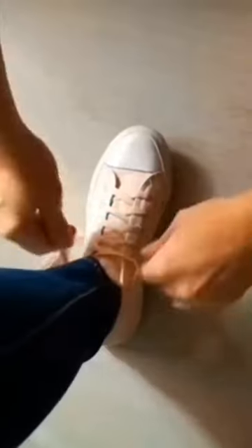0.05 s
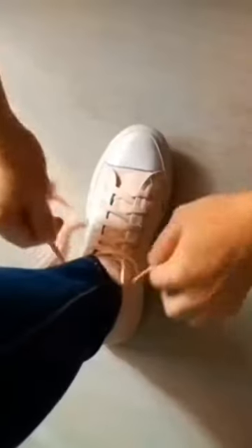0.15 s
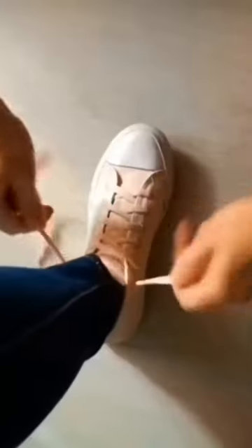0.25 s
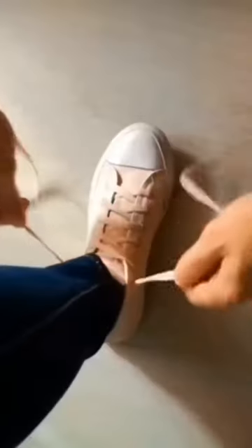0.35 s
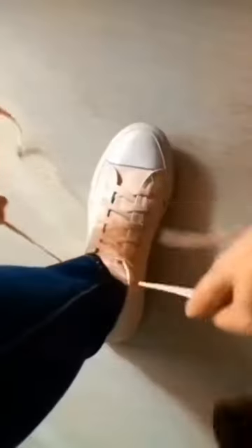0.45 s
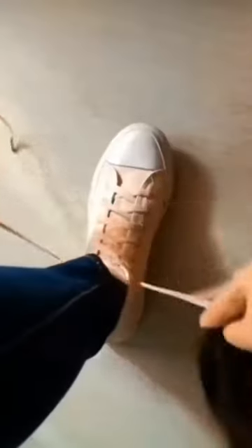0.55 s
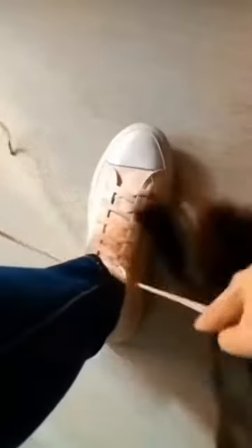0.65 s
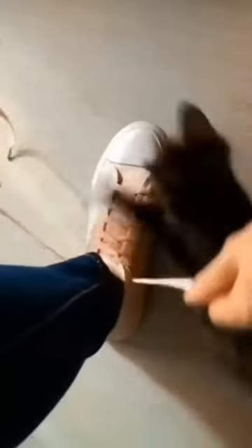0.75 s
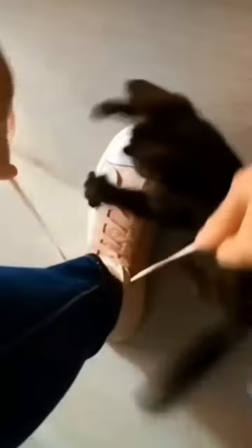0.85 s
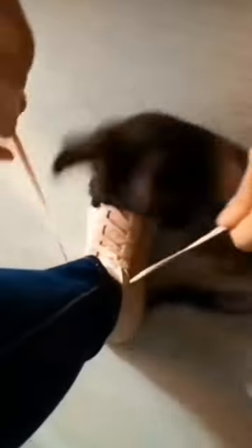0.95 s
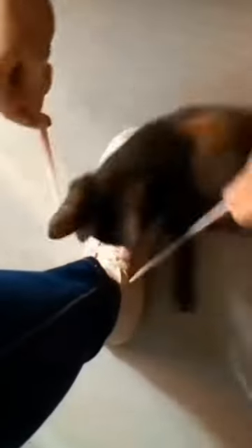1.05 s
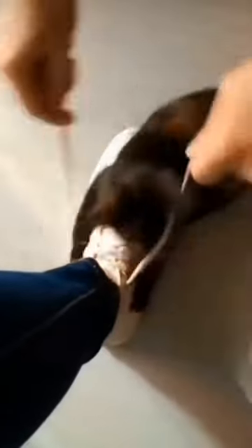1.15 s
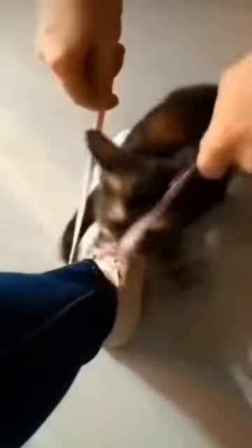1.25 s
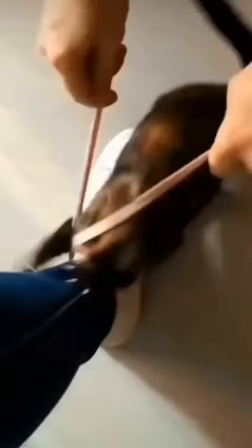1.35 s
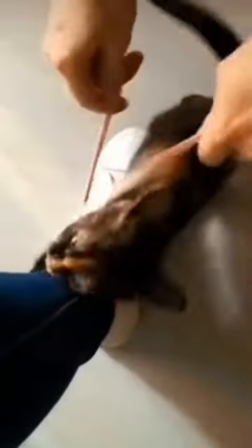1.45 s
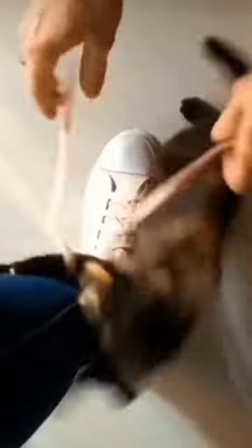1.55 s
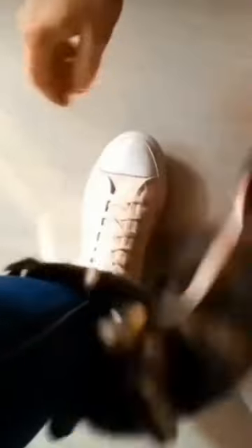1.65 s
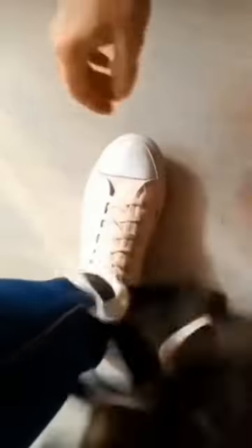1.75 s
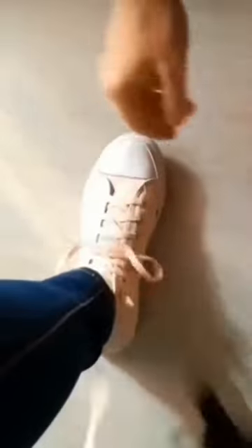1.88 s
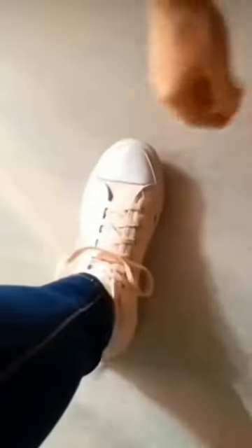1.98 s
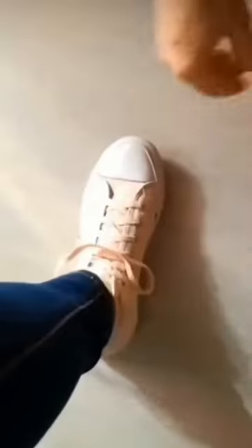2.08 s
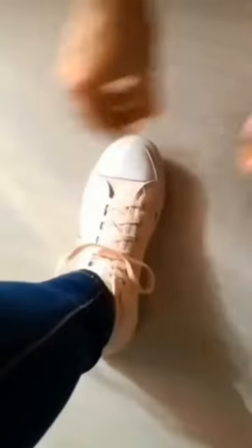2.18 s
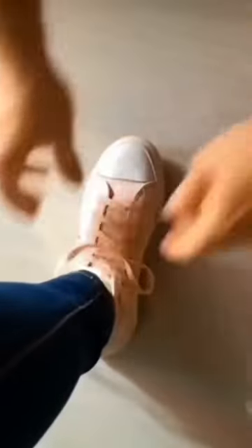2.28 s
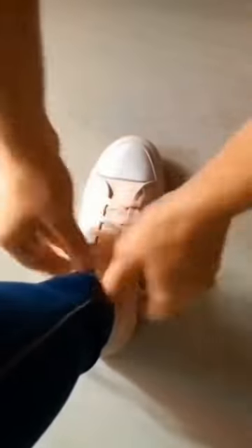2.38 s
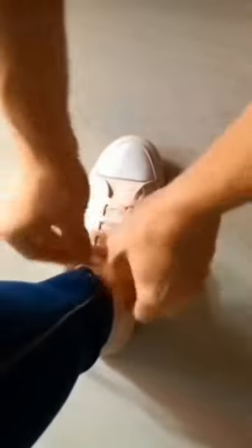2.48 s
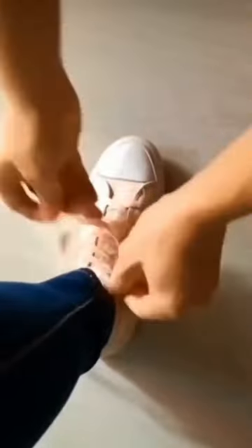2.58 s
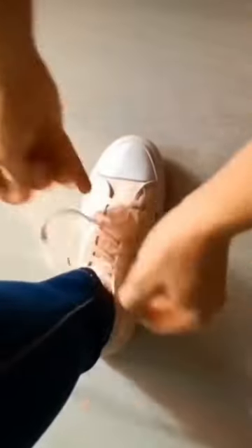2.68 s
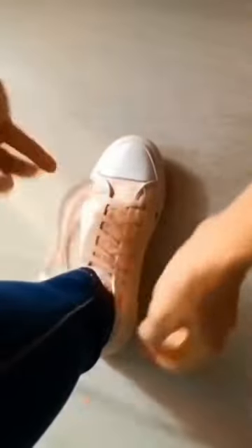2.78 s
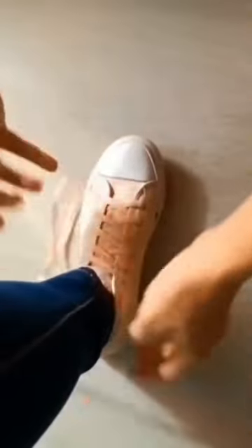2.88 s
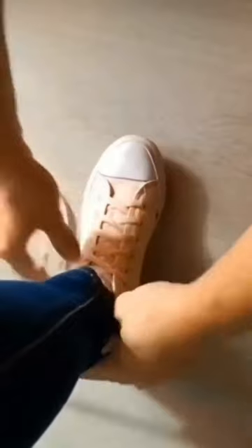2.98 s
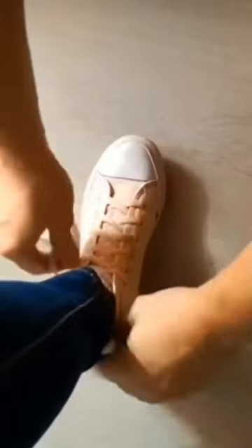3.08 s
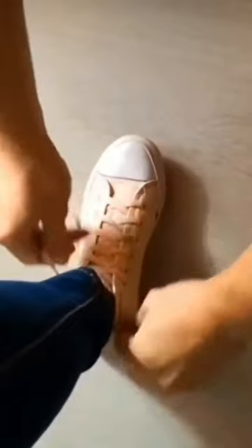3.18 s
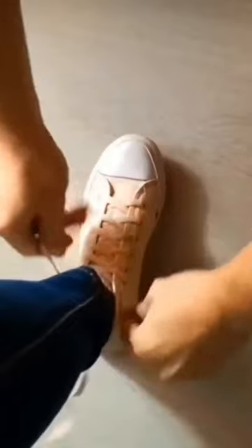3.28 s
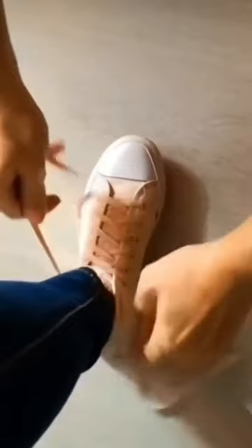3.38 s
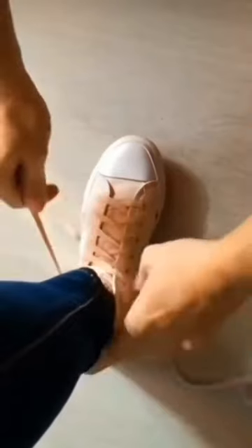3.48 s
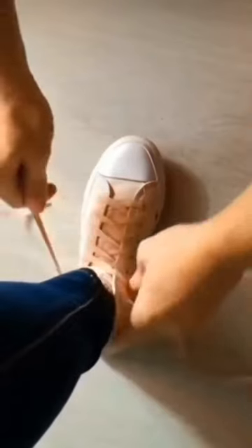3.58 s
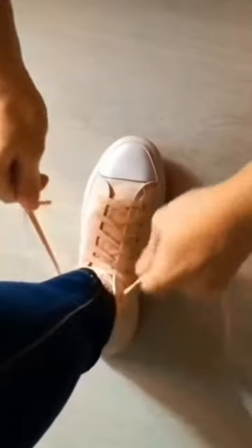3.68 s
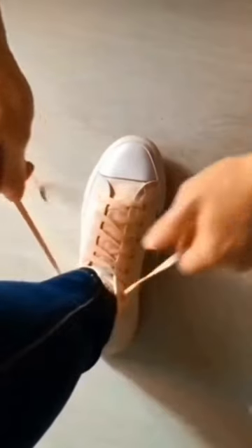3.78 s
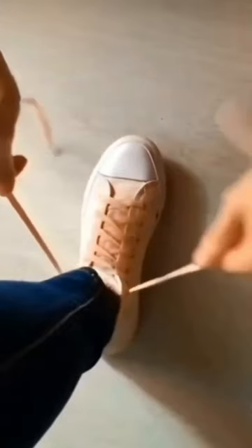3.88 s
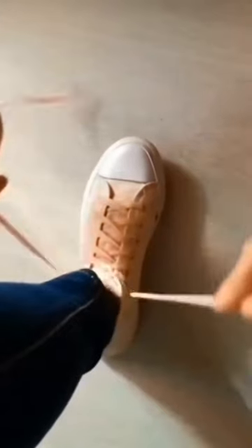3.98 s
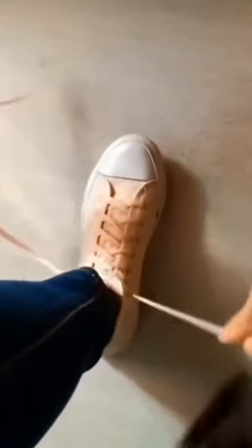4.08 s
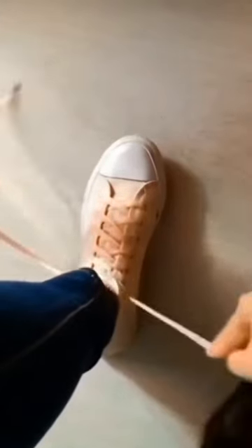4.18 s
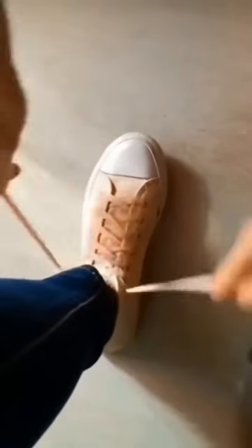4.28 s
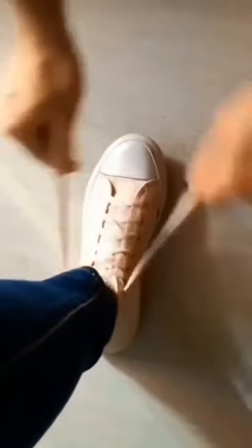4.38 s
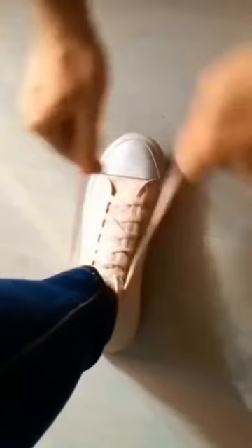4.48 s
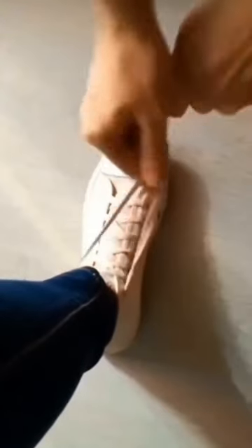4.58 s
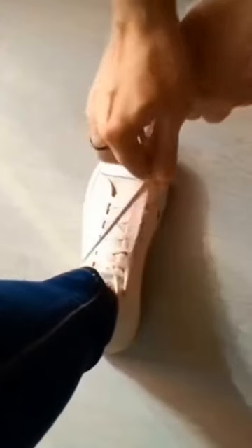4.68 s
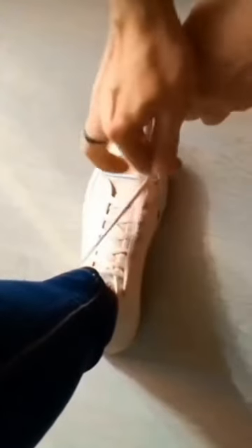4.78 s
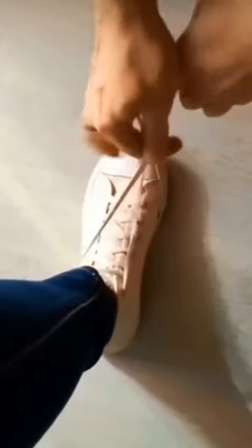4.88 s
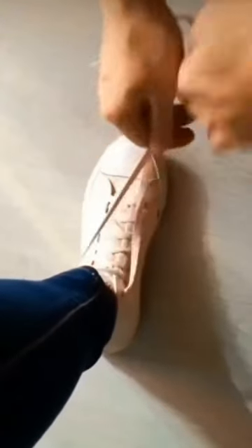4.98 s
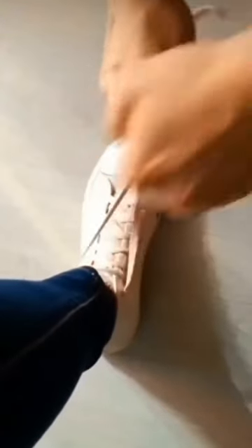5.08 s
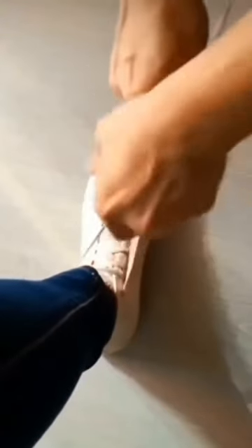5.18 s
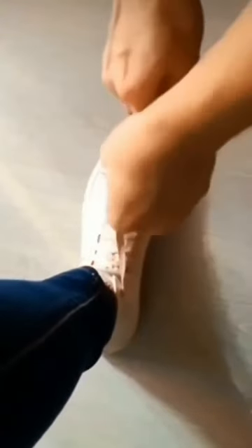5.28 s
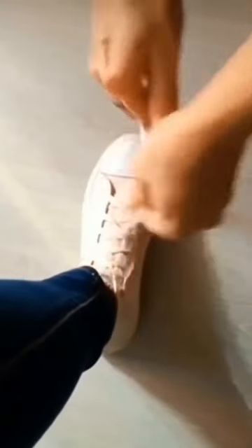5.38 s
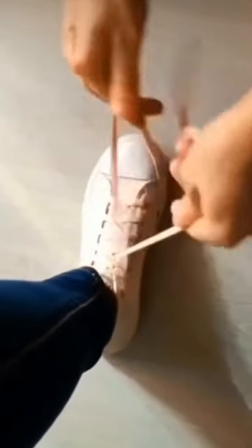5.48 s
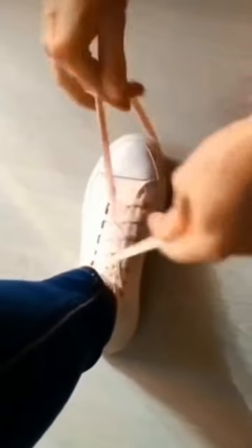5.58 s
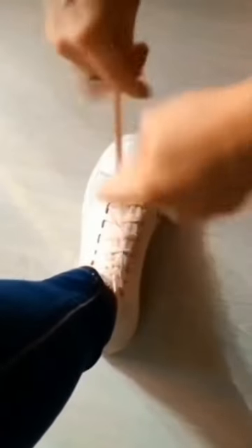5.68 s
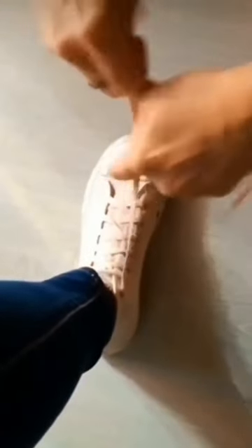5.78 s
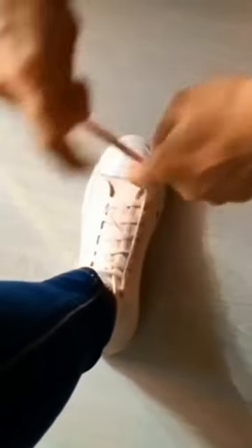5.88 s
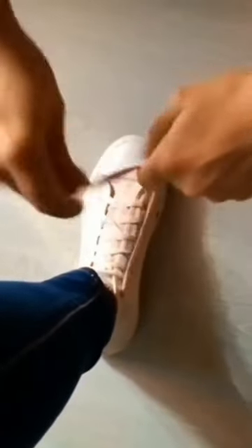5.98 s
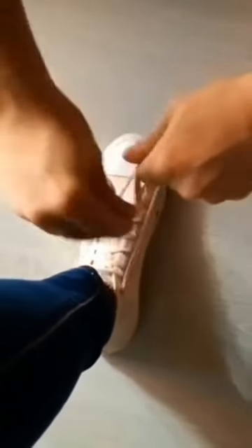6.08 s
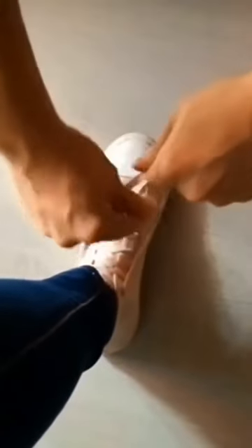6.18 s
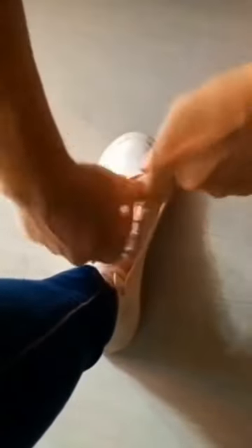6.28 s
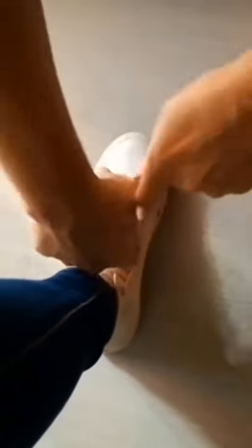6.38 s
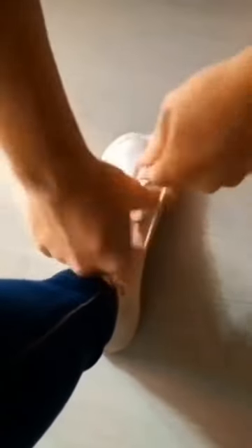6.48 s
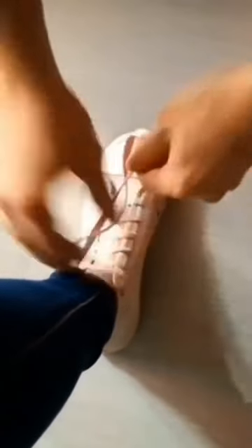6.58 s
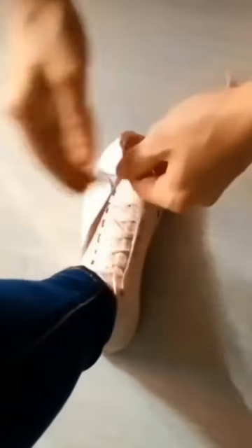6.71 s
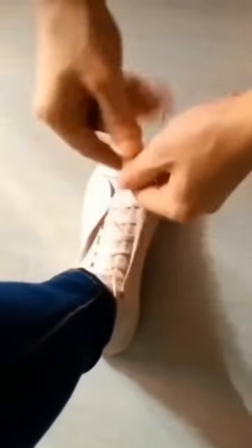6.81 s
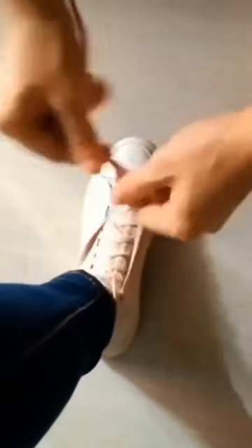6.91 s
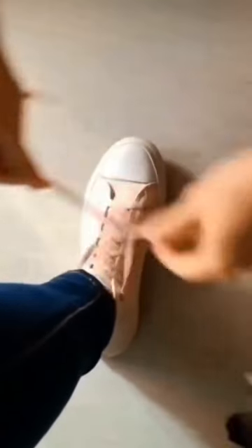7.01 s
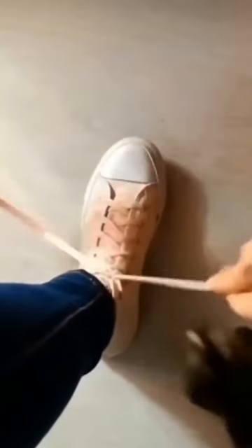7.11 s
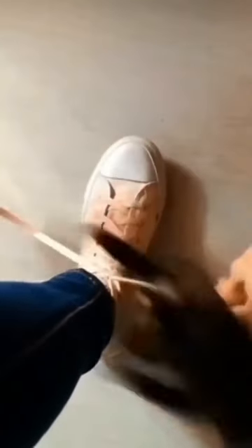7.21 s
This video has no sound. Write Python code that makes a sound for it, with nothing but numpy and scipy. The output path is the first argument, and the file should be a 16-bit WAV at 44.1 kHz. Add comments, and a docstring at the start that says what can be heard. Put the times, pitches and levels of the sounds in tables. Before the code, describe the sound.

Laces rub through a canvas shoe in uneven strokes, mixed with sharp clicks, hollow knocks and paw thuds over a low room rumble.

```python
"""On a hard floor indoors, hands pull and tie the flat laces of a canvas shoe as a kitten pounces on them.
Lace, skin and fur rub in countless tiny slips. The hollow shoe booms near 900 Hz when knocked,
paws and sole thud on the floor, and lace tips and claws snap on rubber and floor.
Two close microphones hear it all over a low room rumble, and overload on the loudest peaks."""
import sys
import numpy as np
from scipy import signal
from scipy.io import wavfile
from scipy.ndimage import uniform_filter1d

SR = 44100
rng = np.random.default_rng(int(sys.argv[2]) if len(sys.argv) > 2 else 0)


def to_wav(sig):
    """Store sig (one row per channel, or 1-D mono) as 16-bit WAV at the path in sys.argv[1].

    Samples outside -1..1 are clipped; the rate is SR.
    """
    pcm = np.clip(np.atleast_2d(sig), -1, 1) * 32767
    pcm = np.round(pcm).astype(np.int16)
    wavfile.write(sys.argv[1], SR, pcm.T)  # frames by channels


N = 319711


def from_db(db):
    """Turn decibels into a number to multiply by."""
    return 10 ** (np.asarray(db) / 20)


def rms_one(x):
    """Scale a sound so that its average strength (rms) is 1."""
    return x / np.sqrt(np.mean(x ** 2) + 1e-20)


def in_time(rows):
    """Join rows that start with a time by straight lines: one curve for each later column."""
    times, *columns = np.transpose(rows)
    return [np.interp(np.arange(N) / SR, times, column) for column in columns]


def at_hz(rows, hz):
    """Look up a value between rows of pitch and value, with octaves evenly spaced."""
    pitches, values = np.transpose(rows)
    return np.interp(np.log(hz), np.log(pitches), values)


def panned(db):
    """Left and right gains for a pan: how many dB louder the left side is than the right."""
    return from_db(np.multiply.outer([.5, -.5], db))


def resonance(x, hz, width_hz):
    """Let a sound ring around one pitch; a narrower width rings longer."""
    r = np.exp(-np.pi * width_hz / SR)
    feedback = [1, -2 * r * np.cos(2 * np.pi * hz / SR), r * r]
    return signal.lfilter([(1 - r * r) / 2, 0, (r * r - 1) / 2], feedback, x)


def drift_gain(rate_hz, spread_db):
    """A volume that wanders by chance, typically by spread_db."""
    step = 40   # samples between points
    r = np.exp(-2 * np.pi * rate_hz * step / SR)
    slow = signal.lfilter([1], [1, -2 * r, r * r], rng.standard_normal(N // step + 2002))[2000:]
    return np.interp(np.arange(N) / step, np.arange(len(slow)), from_db(spread_db * rms_one(slow)))


def swells(*columns):
    """Each event's power at every 32nd sample: it rises 20 dB per rise_s, holds, falls 20 per fade_s."""
    start, db, rise_s, hold_s, fade_s = (np.reshape(column, (-1, 1)) for column in columns)
    t = np.arange(N // 32 + 2) * 32 / SR
    away = np.maximum((start - t) / rise_s, (t - start - hold_s) / fade_s)
    return from_db(db - 20 * np.clip(away, 0, 10)) ** 2


def level(*powers):
    """Add up swells and give their level in dB at every sample."""
    total = np.vstack(powers).sum(axis=0)
    return np.interp(np.arange(N) / 32, np.arange(len(total)), 10 * np.log10(total))


# How alike the two microphones sound. Each row: pitch in Hz, likeness from 0 (unrelated) to 1 (same).
MIC_LIKENESS = [(40, 1), (125, 0.86), (250, 0.92), (500, 0.14), (1500, 0.55), (4000, 0.27), (10000, 0.88)]


def stereo(mid, side, hz):
    """Mix two unrelated sounds into left and right: mid is shared, side makes them differ."""
    alike = at_hz(MIC_LIKENESS, hz)
    return np.sqrt(1 + alike) * mid + np.sqrt(1 - alike) * side * np.array([[1], [-1]])


def grains(per_s, spread_db):
    """Fibres slip at random moments, making clicks of uneven size: two pairs of click streams."""
    chance = rng.random((2, 2, N)) * SR / per_s
    slips = chance < 1
    size_db = spread_db * np.minimum(-np.log(chance[slips] + 1e-9), 5)
    out = np.full(chance.shape, 1e-18)
    out[slips] = from_db(size_db) * rng.choice([-1, 1], slips.sum())
    return rms_one(out)


def rubbed_body(tones, level_db, per_s, lumpy_db):
    """Slips come in lumps and make an object ring at a few broad tones of its own."""
    mid, side = grains(per_s, spread_db=1)[0] * drift_gain(32, lumpy_db)
    ringing = np.zeros((2, N))
    for k, (hz, width, db) in enumerate(tones):
        tone = stereo(resonance(mid, hz, width), resonance(side, hz, width), hz)
        ringing += (-1) ** k * from_db(db) * tone
    return from_db(level_db) * rms_one(ringing)


# The tone of the room's rumble. Each row: pitch in Hz, relative level in dB.
RUMBLE_TONE = [(12, -32), (20, 5), (60, 0.5), (87, 5.5), (119, -5.5), (160, -6), (300, -20), (340, -19.5),
               (400, -7), (520, -37), (880, -120)]
# The rumble swells and sinks. Each row: time in seconds, hum near 90 Hz in dB, throb near 40 Hz in dB.
RUMBLE_SWELLS = [(0.09, -38.5, -48), (0.29, -31.5, -39), (1.54, -31, -35), (1.98, -25, -34),
                 (2.36, -38.5, -40.5), (3.36, -34, -41), (3.64, -43.5, -48), (3.96, -39, -36),
                 (4.04, -46, -52), (4.14, -30, -33), (4.18, -35.5, -43), (4.44, -30, -35), (5.09, -36, -37),
                 (5.19, -43.5, -56), (5.33, -32, -30.5), (5.59, -35, -48), (5.63, -34.5, -33),
                 (5.95, -39, -29.5), (6.15, -42, -51), (6.43, -43.5, -29), (6.65, -45.5, -46),
                 (7.13, -40, -33), (7.19, -33, -44), (7.25, -34, -28)]


def rumble():
    """The room and air on the microphones make a low, unsteady noise."""
    edges_hz = np.geomspace(20, 320, 9)   # half an octave apart
    hum, throb = np.zeros((2, 2, N))
    white = rng.standard_normal((2, 2, N))
    for k, (low, high) in enumerate(zip(edges_hz, edges_hz[1:])):
        band = signal.butter(2, [low, high], "band", fs=SR, output="sos")
        mid, side = signal.sosfilt(band, white[k % 2])
        hz = np.sqrt(low * high)
        layer = throb if hz < 57 else hum
        layer += from_db(at_hz(RUMBLE_TONE, hz)) * drift_gain(3, spread_db=1.5) * stereo(mid, side, hz)
    hum_db, throb_db = in_time(RUMBLE_SWELLS)
    return from_db(hum_db) * rms_one(hum) + from_db(throb_db) * rms_one(throb)


def room_echo(x, ring_s=0.43, wall_cut_hz=3800):
    """Sound bounces between walls along five paths a side, quieter and duller on every round."""
    out = np.zeros((2, N))
    dull = np.exp(-2 * np.pi * wall_cut_hz / SR)
    for k, lag in enumerate((rng.uniform(0.011, 0.028, 10) * SR).astype(int)):
        loop, state = x.copy(), [0.]
        gain = from_db(-60 * lag / SR / ring_s)
        for i in range(lag, N, lag):
            back, state = signal.lfilter([gain * (1 - dull)], [1, -dull], loop[i - lag:i], zi=state)
            loop[i:i + lag] += back[:N - i]
        out[k % 2] += (loop - x) * (-1) ** (k // 2)
    return out


# The tones of sole and floor. Each row: pitch in Hz, width in Hz, relative level in dB.
FLOOR_TONES = [(191, 81, -3.5), (301, 48.6, 0), (415, 143, -8.5)]
# Steady shuffling on the floor. Each row: time in seconds, level in dB.
FLOOR_SHUFFLE = [(0.09, -34.5), (0.4, -30), (0.8, -34), (1.2, -30), (2.2, -30), (2.45, -46), (3.4, -38.5),
                 (4.3, -49.5), (5.0, -34), (5.5, -47.5), (6.5, -41), (6.95, -46), (7.25, -33.5)]


def floor_drag(slide_db=-4, rise_s=0.025, fade_s=0.099):
    """Paws and sole shuffle on the floor and slide on after each thud."""
    start, db, *_ = np.transpose(FLOOR_THUDS)
    slides = from_db(level(swells(start, db + slide_db, rise_s, 0, fade_s)))
    shuffle = from_db(in_time(FLOOR_SHUFFLE)[0])
    return np.hypot(shuffle, slides) * rubbed_body(FLOOR_TONES, 0, per_s=1500, lumpy_db=3)


def padded_blows(rows, swell_s):
    """A soft blow swells briefly, then the struck object rings out."""
    out, t = np.zeros((2, N + SR)), np.arange(SR // 5) / SR
    for (start, db, hz, ring_s, pan), phase in zip(rows, rng.uniform(0, 2 * np.pi, len(rows))):
        shape = (1 - np.exp(-t / swell_s)) ** 2 * from_db(-60 * t / max(ring_s, .01))
        overtone = 0.22 * np.sin(2 * np.pi * 1.45 * hz * t)   # roughens the ring
        ring = np.sin(2 * np.pi * hz * t + phase) + overtone
        i = round((start - swell_s) * SR)   # contact begins before the ring is heard
        out[:, i:i + len(t)] += np.outer(panned(pan), from_db(db) * shape / shape.max() * ring)
    return out[:, :N]


# Thuds on the floor. Each row: start in seconds, level in dB, pitch in Hz, seconds to fade 60 dB,
# pan in dB.
FLOOR_THUDS = [(0.822, -18, 295, 0.11, -1.5), (0.909, -28, 283, .08, 1), (1.145, -17, 281, 0.03, -6),
               (1.833, -12, 353, 0.12, 2), (1.93, -11, 401, 0.082, 4), (1.969, -14, 262, 0.063, -3),
               (4.361, -22, 270, 0.045, 1), (4.41, -14, 255, .056, -3), (4.459, -8, 303, .13, -4),
               (4.73, -25.5, 290, 0.091, 2), (5.379, -19, 346, 0.082, 0), (5.543, -17, 313, 0.065, 1),
               (5.779, -30.5, 390, 0.056, 4), (7.038, -25, 412, 0.065, 9.5)]


def floor_thuds():
    """Paws and sole land on the floor with a low thud."""
    return padded_blows(FLOOR_THUDS, swell_s=0.00482)


# Knocks on the shoe. Each row: start in seconds, level in dB, pitch in Hz, seconds to fade 60 dB,
# pan in dB.
SHOE_KNOCKS = [(0.218, -7.5, 860, 0.028, -1), (0.445, -15.5, 1250, 0.018, -2),
               (0.674, -3.5, 844, 0.011, -1), (0.825, 0, 854, 0.02, -2), (0.915, 6.5, 926, 0.024, -1),
               (0.93, -5.5, 954, .03, -3), (1.144, -7.5, 679, 0.026, -15), (1.656, -10, 1010, 0.014, -0.5),
               (1.769, -9.5, 790, .033, 3), (1.812, -8, 870, .036, 3), (1.834, -2, 772, 0.1, 4),
               (1.91, -10, 910, 0.017, 7), (1.934, -1.5, 1244, .038, -5), (1.946, 7.5, 980, 0.014, 19),
               (2.661, -14.5, 720, 0.023, -11), (2.801, -28, 880, 0.045, -6), (3.382, -12, 644, 0.027, 0),
               (3.4, -10.5, 606, 0.028, -1), (4.115, -12.5, 953, 0.046, 10), (4.146, -5, 965, .021, 8),
               (4.173, -10.5, 882, 0.036, 7), (4.255, -10, 937, .023, 3), (4.349, -9, 832, .027, 0),
               (4.359, -5.5, 874, 0.015, 0), (4.461, -1.5, 702, 0.027, -20), (4.49, -4, 886, 0.06, 1.5),
               (4.535, -11, 1256, .044, 4), (4.729, -17.5, 1090, 0.029, -14), (4.91, -17, 1430, 0.01, -26),
               (5.127, -25, 1117, .048, -18), (5.541, -14, 955, 0.041, 1), (5.587, -14, 940, .03, 8),
               (5.781, -16, 940, 0.023, 1), (5.831, -8, 1065, 0.0083, 0), (7.029, -1.5, 1222, 0.049, 0),
               (7.167, -15, 1088, .039, -1), (7.184, -15.5, 939, 0.034, 3)]


def shoe_knocks():
    """A soft knock makes the hollow of the shoe boom."""
    return padded_blows(SHOE_KNOCKS, swell_s=0.001976)


# Bursts of crackle. Each row: time of the peak in seconds, level in dB, seconds to rise 20 dB,
# seconds held, seconds to fade 20 dB.
CRACKLE_BURSTS = [(0.216, -28, .003, .01, .005), (0.826, -48, .009, 0, .02), (0.918, -37, .011, 0, .027),
                  (1.141, -40, .006, 0, .02), (1.211, -25, .018, 0, .03), (1.652, -55, .006, .004, .01),
                  (1.77, -36, .013, .12, .02), (1.9, -46, .01, .03, .02), (1.942, -29, .025, 0, .06),
                  (1.99, -47, .02, 0, .06), (3.401, -26, .005, .006, .014), (4.15, -42, .01, 0, .012),
                  (4.459, -37, .01, 0, .023), (4.495, -36, .025, 0, .04), (4.908, -53, .005, .008, .004),
                  (5.282, -53, .004, .002, .014), (5.829, -43, .004, .006, .007),
                  (7.039, -37, .022, .03, .028)]


def crackle(stop_db=-22):
    """The hardest contacts give off clumps of tiny, very high ticks."""
    power = swells(*np.transpose(CRACKLE_BURSTS))
    sounding = power > power.max(axis=1, keepdims=True) * from_db(stop_db) ** 2
    loudness = from_db(level(power * sounding + 1e-30))
    mid, side = grains(per_s=12000, spread_db=16)[0] * drift_gain(150, spread_db=2)
    top_only = signal.cheby2(8, 60, 9000, "high", fs=SR, output="sos")
    return signal.sosfilt(top_only, loudness * rms_one(stereo(mid, side, 12000)))


# Snaps of lace tips and claws. Each row: start in seconds, peak level in dB, pitch in Hz,
# scuff in dB compared with the tick, pan in dB.
TIP_AND_CLAW_SNAPS = [(0.1853, -17.5, 4950, -13, 0), (0.218, 8, 3960, -9, 2), (0.7287, -19, 3630, -8, -6),
                      (0.913, 3, 1600, 16, -1), (1.142, -3.5, 1840, -15, -12.5), (1.146, -3.5, 3100, 4, 2),
                      (1.1962, -4, 5260, -6, -10), (1.209, -2, 3320, -2, -15), (1.2257, 0.5, 3250, -6, -2),
                      (1.243, -10, 2230, -8, 3), (1.559, -13.5, 1630, -7, 1), (1.6536, 0.5, 1840, -16, -1),
                      (1.759, -11, 3000, -2, -8), (1.7695, 0, 4800, -2.5, -5),
                      (1.8114, -17, 2900, -9.5, -1.5), (1.879, 0.5, 3030, 1, -0.5),
                      (1.936, 3, 2140, -13, -5), (2.72, -12.5, 5400, -16, -11), (3.027, -10, 1730, 3, 4),
                      (3.2133, -15, 3370, -22, 7), (3.4003, 8, 4470, -11, -11),
                      (4.1446, -2.5, 4240, 7, -9.5), (4.164, -10, 3250, -6.5, 0),
                      (4.173, -10, 2240, -12, -1.5), (4.3565, -7, 3950, -9, -4), (4.4488, -7, 4700, -2, -2),
                      (4.883, -13.5, 2760, 1, 3), (4.9065, -4.5, 2650, -8, -6), (5.126, -16, 1650, -12, -1),
                      (5.284, -7, 2560, 1, -12), (5.382, -14, 3520, -10, 5), (5.545, -9.5, 5500, -8, -1),
                      (5.8315, -4.5, 5140, -19, -18), (6.541, -21, 1780, -5, -3),
                      (6.8004, -24.5, 2230, -6, -2), (7.0145, -11, 1500, -4, -9)]


def snaps(tick_s=.016, scuff_s=0.075):
    """A lace tip or claw hits rubber or floor: a hard tick rings briefly and a scuff trails after it."""
    out, t = np.zeros((2, N + SR)), np.arange(SR // 4) / SR
    for start, db, hz, scuff_db, pan in TIP_AND_CLAW_SNAPS:
        mid, side = rng.standard_normal((2, len(t)))
        noise = np.minimum(t / 0.0011, 1) * stereo(mid, 0.49 * side, hz)
        tick = noise * from_db(-60 * t / tick_s)
        tick[:, round(.0008 * SR)] += 6.0   # the first hard contact
        scuff = noise * from_db(scuff_db - 60 * t / scuff_s)
        ringing = resonance(resonance(tick + scuff, hz, 0.36 * hz), hz, 0.36 * hz)
        scrape = resonance(resonance(scuff, 2700, 4000), 3600, 4000)
        snap = ringing + 0.1 * resonance(tick, 3000, 3100) + 0.24 * scrape
        i = round(start * SR)
        out[:, i:i + len(t)] += from_db(db) * panned(pan)[:, None] * snap / np.abs(snap).max()
    return out[:, :N]


def grip(dip_db=-3, grip_s=0.046):
    """Cloth and lace grip before they let go, so the rubbing dips just ahead of each snap."""
    hush_db = np.zeros(N)
    for start, *_ in TIP_AND_CLAW_SNAPS:
        ahead = slice(round((start - grip_s) * SR), round(start * SR))
        hush_db[ahead] = np.minimum(hush_db[ahead], np.linspace(0, dip_db, ahead.stop - ahead.start))
    return from_db(uniform_filter1d(hush_db, size=100))


# The tones of the hollow shoe. Each row: pitch in Hz, width in Hz, relative level in dB.
SHOE_TONES = [(707, 229, -1.5), (913, 230, 1.5), (1115, 213, -0.5)]


def hollow_rustle(rubbing_power, knock_db=-13.5, rise_s=0.018, fade_s=0.071):
    """The hollow of the shoe rustles when it is rubbed, and around each knock."""
    start, db, *_ = np.transpose(SHOE_KNOCKS)
    knock_power = swells(start, db + knock_db, rise_s, 0, fade_s)
    return rubbed_body(SHOE_TONES, level(rubbing_power, knock_power), per_s=3000, lumpy_db=1)


# The tone of rubbed cloth. Each row: pitch in Hz, relative level in dB.
CLOTH_TONE = [(710, -34), (1200, -10), (1420, -3.5), (1880, -5), (4030, -2), (6260, -5.5), (7460, -5),
              (9220, -11), (9800, -19.5), (12700, -56), (21600, -120)]
# How bright a light stroke is. Each row: time in seconds, treble in dB compared with the stroke.
CLOTH_TREBLE = [(0.09, -45), (0.3, -43), (0.37, -7.5), (1.1, -11.5), (1.2, -14), (1.3, -9), (2.0, -6.5),
                (2.6, -8.5), (3.1, -9.5), (3.4, -4), (3.7, -10.5), (3.94, -5), (4.15, -16.5), (4.42, -14.5),
                (4.5, -8), (4.72, -5), (4.93, -15.5), (5.3, -13), (5.49, -4), (5.56, -15.5), (5.72, -8),
                (5.83, -15), (6.0, -7.5), (7.25, -6.5)]


def cloth_friction(level_db, coarse_db, light_db=-34):
    """Lace through eyelets and fingers, fur on canvas: dense slips ring many small patches of cloth."""
    streams = grains(per_s=6000, spread_db=2)
    bands = np.zeros((3, 2, N))   # low, middle and top patches
    pitches = np.linspace(np.sqrt(1200), np.sqrt(9900), 52) ** 2
    for k, (hz, lag) in enumerate(zip(pitches, rng.integers(-2, 3, len(pitches)))):
        mid, side = resonance(streams[k % 2], hz, 60 + 0.00067 * hz)
        wander = drift_gain(9.9, spread_db=2.5 + 1.95 * hz / 10000)   # each patch swells on its own
        left, right = from_db(at_hz(CLOTH_TONE, hz)) * wander * stereo(mid, side, hz)
        right = from_db(2.5 * hz / 10000) * np.roll(right, lag)   # a different path to each microphone
        bands[np.searchsorted([2400, 6600], hz)] += (-1) ** (k // 2) * np.array([left, right])
    below_top = signal.butter(10, 6800, fs=SR, output="sos")
    low, middle = (rms_one(signal.sosfilt(below_top, band)) for band in bands[:2])
    treble_db = in_time(CLOTH_TREBLE)[0] - 0.173 * (level_db - light_db)   # harder strokes are duller
    cloth = from_db(coarse_db) * low + from_db(-0.5) * middle + from_db(treble_db) * rms_one(bands[2])
    return from_db(level_db) * drift_gain(23.4, spread_db=0.5) * cloth


# Strokes of lace, fingers and fur. Each row: time of the peak in seconds, level in dB, seconds to
# rise 20 dB, seconds held, seconds to fade 20 dB, coarse weave in dB, hollow of the shoe in dB,
# pan in dB. Weave and hollow are compared with the stroke's level.
LACE_STROKES = [(0.09, -35.5, -0.5, 0.092, -0.5, -0.5, -4, 1),
                (0.229, -7, 0.0149, 0, 0.1233, -12, -13.5, 1), (0.46, -24.5, 0.28, 0.13, 0.4, -3, -9, -0.5),
                (0.73, -26, 0.1, 0, 0.4, -2, -10, -1.5), (0.833, -22.5, -0.02, 0.039, -0.16, -10, -13, -4),
                (0.93, -15, 0.09, 0.016, 0.03, -3.5, -10, 0.5),
                (0.999, -25.5, -0.3, 0.18, 0.3, -2.5, -3, -0.5),
                (1.144, -16, 0.04, 0.014, 0.0354, -6, -2.5, -9),
                (1.197, -8, 0.05, 0.028, 0.0657, -7, -22, -1.5),
                (1.275, -22, 0.2, 0.068, 0.3, -5.5, -14.5, -1),
                (1.517, -25.5, 0.07, 0.069, 0.13, -3, -11, -6.5),
                (1.661, -23, 0.04, 0.0028, 0.13, 1, -0.5, -3), (1.7, -19.5, .1, 0.035, .06, -4.5, -9, -3),
                (1.775, -6.5, 0.03, 0.078, 0.2076, -2.5, -6.5, 0),
                (1.942, -6.5, 0.06, 0.0041, 0.08, -4, -2.5, 1.5),
                (1.987, -13, 0, 0.065, 0.0873, -6, -14, 0), (2.077, -23, 0.2, .12, 0.09, -4.5, -9.5, 0.5),
                (2.497, -30, .08, 0.026, 0.34, -10.5, -20.5, -3),
                (2.66, -24, 0.12, 0.053, 0.16, -7, -6.5, -4),
                (2.826, -26.5, 0.17, 0.033, -0.1, -19, -21, -3),
                (3.036, -20.5, 0.05, 0.049, 0.14, -3, -15, -1),
                (3.22, -21, 0.33, 0, 0.17, -6.5, -16.5, -1.5),
                (3.421, -8.5, .045, 0.0058, 0.1268, -12, -15, 0), (3.56, -32.5, 0, 0.19, 0.03, -6, -26, -3),
                (3.739, -23.5, 0.23, 0, .085, -7.5, -15.5, 0), (3.85, -32.5, 0, 0.098, 0.1, -13, -18, -3.5),
                (4.162, -17.5, 0.0529, 0.013, 0.06, 0, -0.5, 0.5),
                (4.26, -26, 0.12, 0.0091, 0, -4, -2.5, -2), (4.361, -19.5, 0.01, 0, -0.16, -5, -8, 1),
                (4.39, -23, 0.12, 0.084, -0.2, -11, -6, 0), (4.46, -10.5, 0.02, 0.0029, 0.09, -6.5, -8, -1),
                (4.494, -15, 0.03, 0.054, 0.09, -7, -3.5, 0.5),
                (4.636, -22.5, -0.04, 0.067, 0.1, -8.5, -14, -4.5),
                (4.736, -26.5, -0.06, 0.019, -0.11, -10, 6.5, -0.5),
                (4.919, -18.5, 0.03, 0, -0.01, -3, -28, -6), (4.961, -23, 0.17, 0.086, 0.14, -2.5, -10, -3),
                (5.121, -26, 0.2, 0.023, 0.15, -2, -6.5, -2),
                (5.291, -20, -0.22, 0.069, 0.04, -2, -9, -8.5), (5.351, -16, 0.07, 0, 0.1847, -4, -7, -2.5),
                (5.545, -21, -0.35, 0.049, 0.0956, -5.5, 0.5, -1),
                (5.791, -34.5, .06, 0.016, -0.02, -7, 7, 1), (5.832, -23, 0.07, 0.015, 0.14, -10, -6.5, -1),
                (5.996, -44, 0.5, 0.12, 0.63, -5, -5, 0), (6.147, -38, -0.7, 0.037, 0.24, -5.5, -8.5, -1),
                (6.325, -35, 0.17, .04, 0.13, -5, -11, 0),
                (6.561, -27.5, 0.11, 0.046, 0, -4.5, -16.5, -1.5),
                (6.7, -46, 0.4, 0.17, -0.5, -1.5, -2.5, 1.5), (6.926, -41, 0.1, 0.012, -3, -7, -12, 0),
                (7.049, -8, 0.0529, 0.0039, 0.08, -4, -2, -1.5),
                (7.11, -19.5, 0.0664, 0, 0.6, -6, -4.5, -0.5)]


def lace_strokes(shortest_rise_s=.02, shortest_fade_s=.06):
    """Strokes rub the shoe; the loudest leads the tone and side. Gives the sound and its pan in dB."""
    start, db, rise_s, hold_s, fade_s, weave_db, hollow_db, pan = np.transpose(LACE_STROKES)[:, :, None]
    rise_s, fade_s = np.maximum(rise_s, shortest_rise_s), np.maximum(fade_s, shortest_fade_s)
    power = swells(start, db, rise_s, hold_s, fade_s)
    rest = np.full_like(power[:1], from_db(-46) ** 2)   # faint handling between strokes
    level_db = level(power, rest)
    coarse_db = level(power * from_db(weave_db) ** 2, rest * from_db(0.5) ** 2) - level_db
    hollow_power = np.vstack([power * from_db(hollow_db) ** 2, rest * from_db(-9) ** 2])
    left_db, right_db = (level(power * gain ** 2, rest) for gain in panned(pan))
    pan_db = left_db - right_db
    rubbing = cloth_friction(level_db, coarse_db) + hollow_rustle(hollow_power)
    return panned(pan_db) * grip() * rubbing, pan_db


def scene():
    """Add up the rubbing, the hits and their echo, the dragging, the rumble and the crackle."""
    rubbing, pan_db = lace_strokes()
    hits = shoe_knocks() + floor_thuds() + snaps()
    mix = rubbing + floor_drag() + hits + from_db(-15) * room_echo(hits.mean(axis=0)) + rumble()
    soften = signal.ellip(12, .5, 90, 10100, fs=SR, output="sos")   # only the crackle reaches higher
    return signal.sosfilt(soften, mix) + panned(pan_db - 4) * crackle()


def record(dry, opens_s=0.079, top_hz=16295):
    """The microphones switch on, overload flattens the loudest peaks, and the highest treble is cut."""
    opened = dry * np.clip((np.arange(N) / SR - opens_s) / 0.018, 0, 1)
    flattened = opened / (1 + np.abs(opened) ** 16) ** (1 / 16)
    top_cut = signal.cheby2(12, 40, top_hz, fs=SR, output="sos")
    return np.clip(signal.sosfilt(top_cut, flattened), -1, 1)


dry = scene()
out = record(dry)
to_wav(out)
```